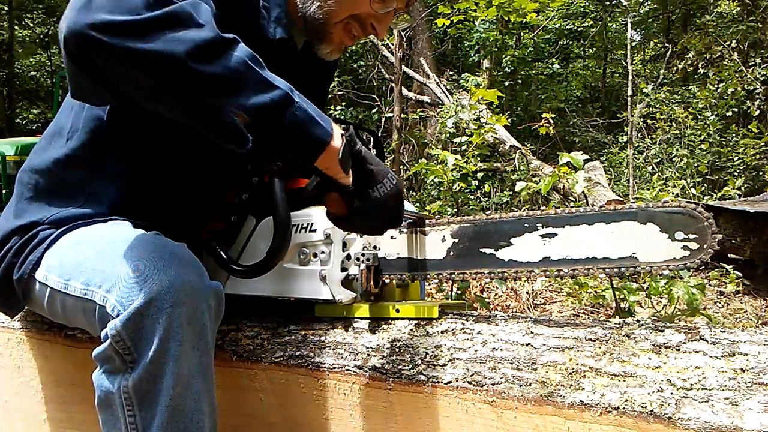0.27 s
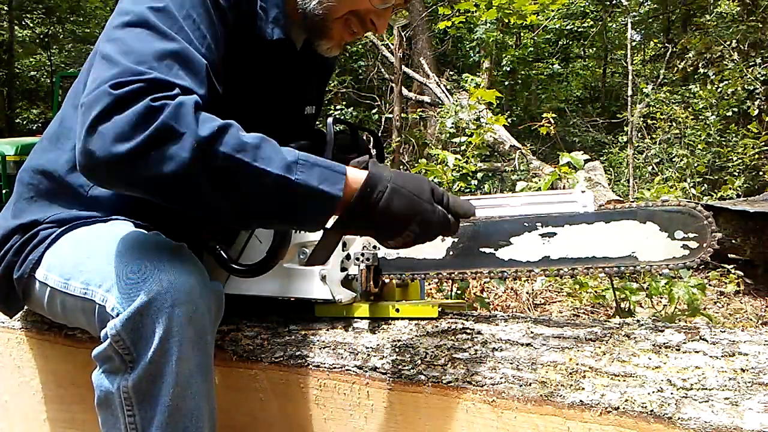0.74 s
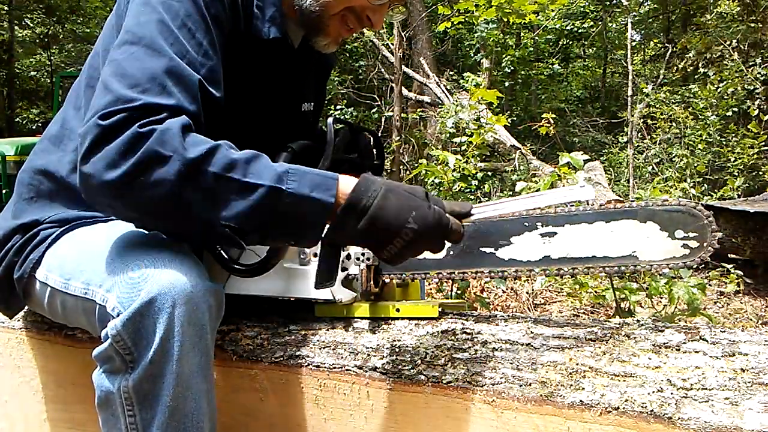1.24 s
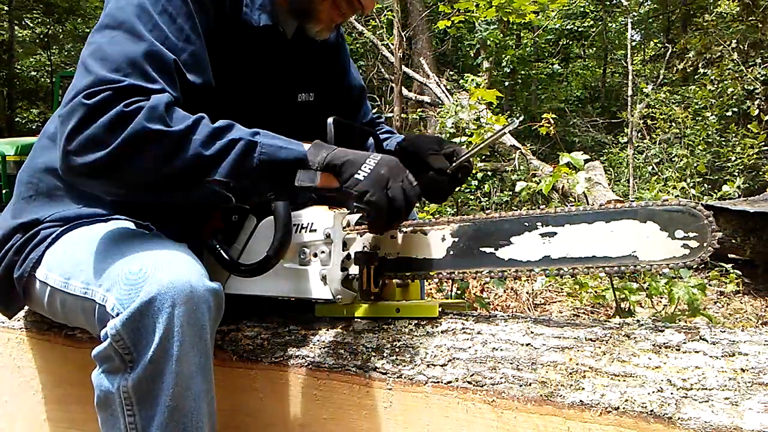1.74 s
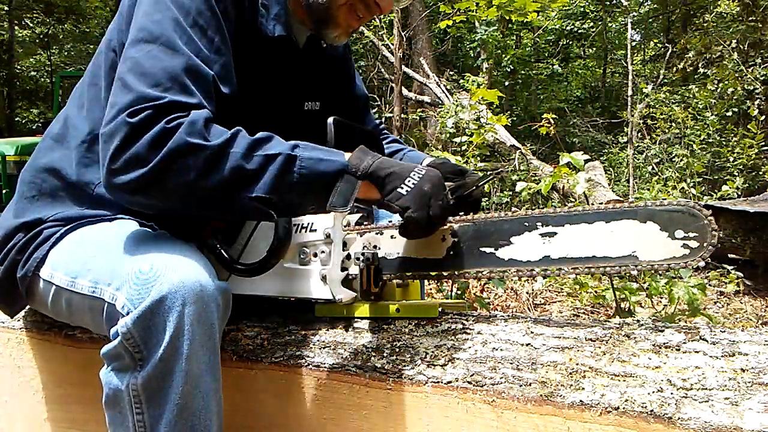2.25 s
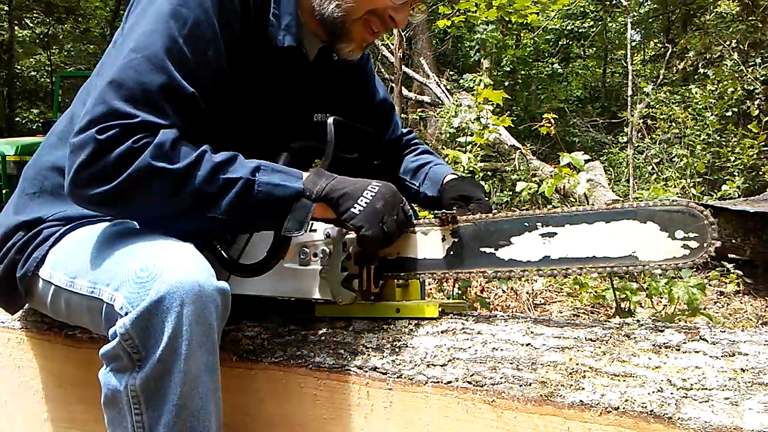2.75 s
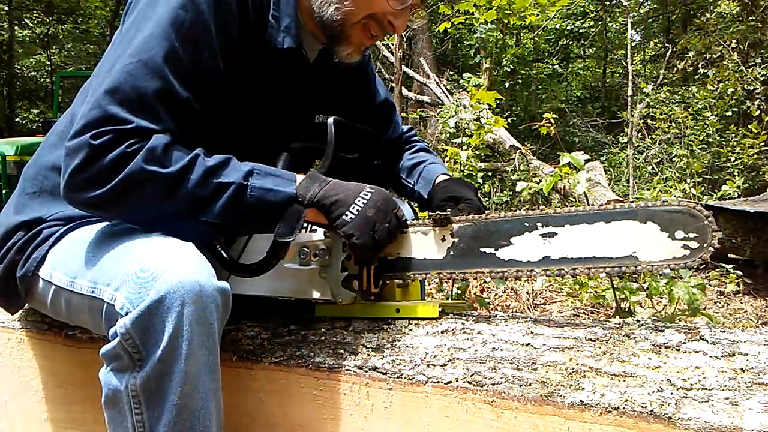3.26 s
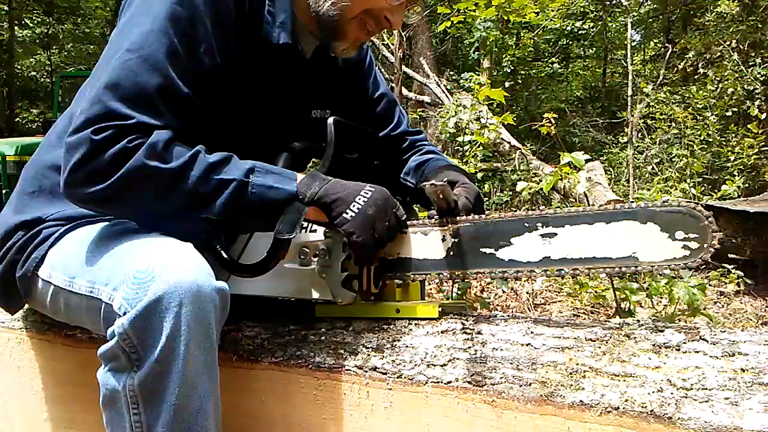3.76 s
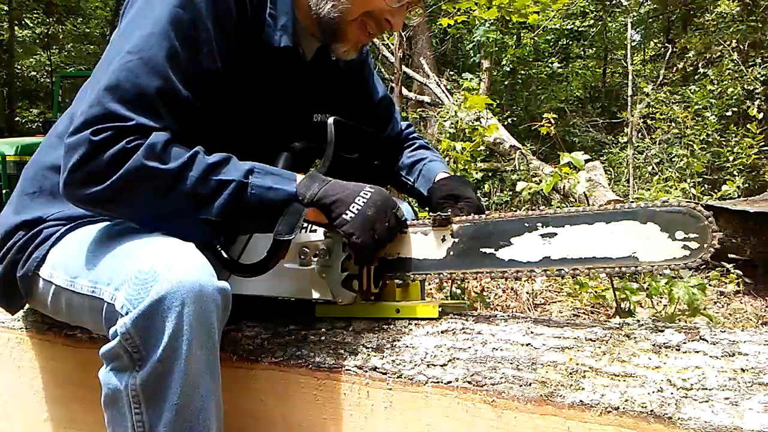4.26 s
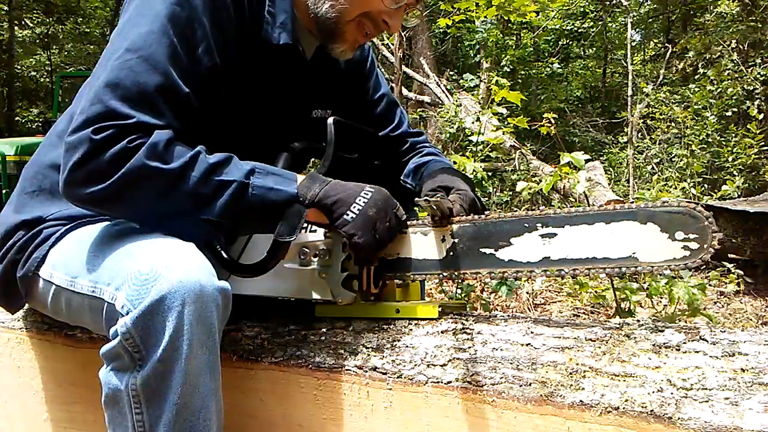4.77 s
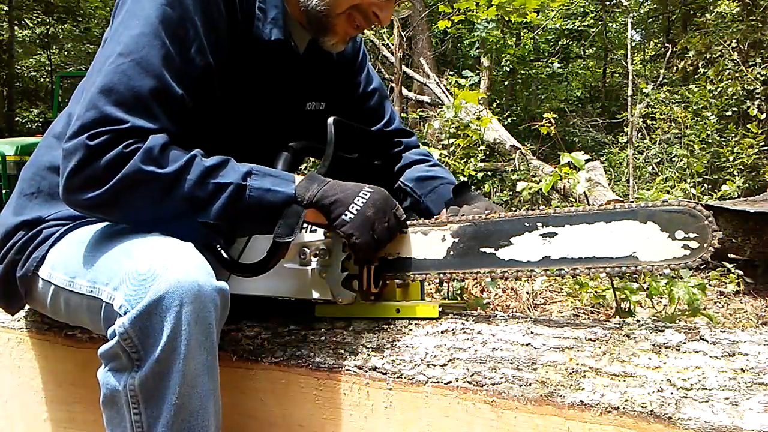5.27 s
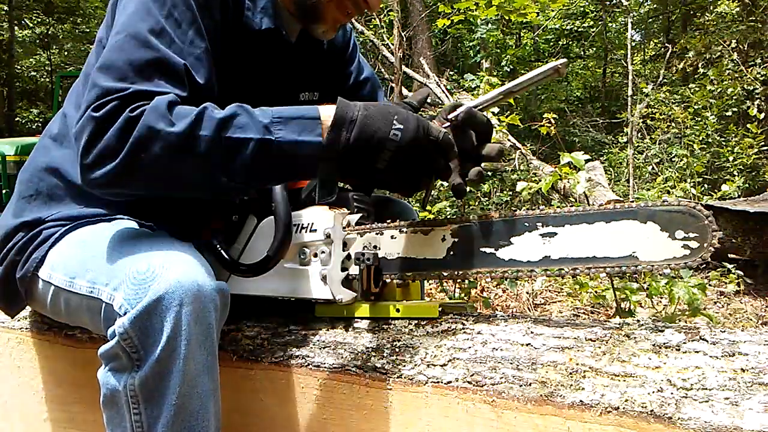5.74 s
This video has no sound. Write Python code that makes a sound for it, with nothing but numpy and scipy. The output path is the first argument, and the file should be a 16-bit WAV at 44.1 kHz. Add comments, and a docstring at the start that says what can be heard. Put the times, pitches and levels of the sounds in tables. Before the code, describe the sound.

Faint, softly crackling outdoor air lies underneath, with everything close and dry. Tiny clicks and a glove rub open, then from 0.2 to 0.6 seconds a file rasps over a saw tooth, grainy and hissy, swelling and fading. At 1.05 and 1.22 two very loud, sharp raps hit the steel bar, each chattering and rebounding within hundredths of a second, the second brighter, with a short lumpy echo from the trees. Around 2.0 to 2.25 a thin ping, a cluster of small clicks, a dull housing hum, glove rustle and a light scratchy slide. Sparse clicks and rubs continue from 2.65 to 3.1. A second stroke, more resonant, runs 3.3 to 3.85; clicks and cloth at 4.2 to 4.35; a third stroke 4.45 to 4.95. Two last hard raps ring at 5.32 and 5.51, then a faint rub at 5.84 and quiet.

```python
"""Outdoors at the edge of a wood, a saw chain is sharpened with a round file; the direct sound stands far above the trees.
First a few clicks and one long rasping stroke: grains of noise, paced by the file's teeth, through the saw's resonances.
Then two raps on the steel bar, noise cracks with dying sines, which the trees return as a lumpy noise tail.
Gloves rustle, file and links click, a cutter pings and the file slides lightly; two more strokes follow, with
clicks between them, then two last raps. Faint air lies under it all; the microphone chain gates, overloads and filters."""
import sys
import numpy as np
from scipy import signal
from scipy.fft import rfft, irfft, next_fast_len
from scipy.io import wavfile
from scipy.ndimage import uniform_filter1d

SR = 44100
rng = np.random.default_rng(int(sys.argv[2]) if len(sys.argv) > 2 else 0)


def to_wav(sig):
    """Store sig (one row per channel, or 1-D mono) as 16-bit WAV at the path in sys.argv[1].

    Samples outside -1..1 are clipped; the rate is SR.
    """
    pcm = np.clip(np.atleast_2d(sig), -1, 1) * 32767
    pcm = np.round(pcm).astype(np.int16)
    wavfile.write(sys.argv[1], SR, pcm.T)  # frames by channels


N = 265041
TIME = np.arange(N) / SR
PADDED = next_fast_len(N, True)
HZ = np.fft.rfftfreq(PADDED, 1 / SR)

# Spectrum of the quiet outdoor air: (frequency [Hz], level [dB])
AIR_SPECTRUM = [(20, 17.5), (60, 10), (130, -2), (300, 6), (600, 3), (1500, -2.5), (3600, -1.5), (3980, 8),
                (4400, -13.5), (5200, -14), (6000, -7), (7800, -2), (11000, -7), (16000, -14)]
# Spectrum of the crackle over the air: (frequency [Hz], level [dB])
CRACKLE_SPECTRUM = [(100, -13.5), (350, 1.5), (4100, 2.5), (5000, -9), (6500, -9.5), (9000, -24.5)]

# Gloves and sleeves rub on the saw: (start [s], length [s], level [dB])
GLOVE_RUBS = [(-.01, 0.059, -51.5), (0.145, 0.025, -56), (0.64, .02, -57), (1.407, 0.08, -60),
              (2.065, 0.174, -50.5), (2.25, 0.056, -61.5), (2.657, 0.048, -57.5), (2.77, 0.035, -54),
              (2.806, 0.066, -53.5), (2.98, .022, -58.5), (3.042, 0.036, -54.5), (3.093, 0.219, -58.5),
              (4.196, 0.026, -53.5), (4.252, 0.068, -55), (5.84, 0.049, -62)]
# Spectrum of the cloth: (frequency [Hz], level [dB])
CLOTH_SPECTRUM = [(100, -27), (250, -1), (440, 5.5), (620, 3), (950, 5), (1600, -1), (2800, -4.5),
                  (4100, -1.5), (4600, -57), (8000, -18), (16000, -46)]
# Every light rub starts quickly, presses harder by this much in all, then lets go
RUB_ATTACK_S, RUB_RELEASE_S, RUB_PRESS_DB = 0.0076, 0.012, 2

# Small clicks of file and links: (time [s], level before a common trim [dB], centre of colour [Hz],
# treble before fixed offsets [dB])
LINK_CLICKS = [(0.029, -49, 970, 14), (0.07, -42, 1330, -7), (0.14, -50, 1500, -10), (.214, -34, 1300, -21),
               (2.055, -41.5, 1209, -9.5), (2.075, -41, 696, -8), (2.108, -34, 1300, -8),
               (2.114, -36, 1200, -18), (2.1394, -33.5, 910, -14), (2.1648, -30.5, 1250, -8),
               (2.201, -34, 910, -10.5), (2.66, -30, 1600, 0), (2.736, -48, 2000, -13.5),
               (2.815, -43.5, 630, -16), (2.908, -44, 880, -19), (3.048, -42.5, 1106, -16),
               (4.199, -30, 1690, -9), (4.293, -29, 1820, -20), (4.329, -35, 1710, 3.5)]
# Ring of a click centred on 1 kHz; higher ones die sooner by this power
CLICK_T60_S, CLICK_DAMPING = 0.036, 0.34
# The saw's housing resounds as the file settles: (time [s], level [dB])
HOUSING_HUMS = [(2.141, -39.5), (2.201, -38.5)]
HOUSING_HZ, HOUSING_T60_S = 450, 0.095
# A cutter pings as the file is set on it: (frequency [Hz], level [dB], t60 [s])
CUTTER_PING = [(3720, -44, .065), (7880, -55, .09), (10330, -54, .07)]
PING_S = 2.023

# The file slides lightly into the gullet of a cutter
SLIDE_S, SLIDE_LENGTH_S, SLIDE_DB = 2.085, 0.073, -50.5
# Spectrum of that thin scratch: (frequency [Hz], level [dB])
SLIDE_SPECTRUM = [(4500, -47), (6200, -8.0), (7700, 9), (9500, -6), (11000, -12), (15000, -29)]

# Raps of the file on the bar: (time [s], level [dB], knock [dB], brightness [dB], fizz [dB],
# time to the rebound [s], rebound level against the rap [dB])
BAR_RAPS = [(1.0467, -7, -5, 1, -16, 0.01598, -10), (1.2166, -7, -6, 11.5, 5, .0128, -7),
            (5.3233, -4.5, -3, -4, -13.5, .0163, -5.5), (5.5080, -5, -4, 2.5, -8.5, .015, -12.5)]
# Modes of the bar before the chain damps them: (frequency [Hz], relative level [dB], t60 [s])
BAR_MODES = [(301, -14, 0.25), (804.6, -4, 0.095), (1186, -16, 0.058), (1520, -7, 0.051), (1748, -12, 0.11),
             (1770, -0.5, .06), (2540, -4.5, 0.089), (2834, -1.5, 0.06), (3261, -11, .06),
             (3517, -7.5, .05), (3999, -7.5, 0.11), (3870, -9.5, 0.21), (5104, -8, .04), (5380, -11, .05),
             (5740, -9.5, 0.062), (5660, -12, 0.024), (5810, -16, 0.027), (6990, -4.5, 0.059),
             (6390, -4.5, .06), (6700, -11, 0.036), (7170, -14, 0.078), (8500, -14, 0.03), (9400, -9, .05)]
# Spectrum of the dense crack of a contact: (frequency [Hz], level [dB])
CRACK_SPECTRUM = [(30, -31.5), (170, -35), (280, -8), (550, -9.5), (1300, -2), (1750, 2), (2150, -6),
                  (2750, 5), (3900, -6), (4350, -8.5), (5300, -0.5), (6500, -4.5), (10000, -7.5),
                  (12500, -15), (14000, -25.5), (16000, -36.5)]
# Spectrum of the ring as the trees return it: (frequency [Hz], level [dB])
TREE_SPECTRUM = [(100, -21.5), (250, -6), (900, -8.5), (1620, -11), (1780, -1), (2030, -12), (2500, -0.5),
                 (3200, -4), (3980, -2.5), (4450, -19), (5700, -8), (6650, -0.5), (7700, -2), (8500, -6.5),
                 (9700, -5), (11000, -14.5), (16000, -28.5)]
# Thin ring that lingers in the file, before a common lift: (frequency [Hz], level [dB])
FILE_MODES = [(1766, -59.5), (2530, -64), (2767, -60), (3268, -66), (3876, -67), (5582, -66.5), (6627, -61),
              (7617, -67), (7957, -70)]
FILE_RING_DB, FILE_T60_S, FILE_BLUR_HZ = 19.5, 0.5, 70
# The file's far end lands just after its tip
CHATTER_S, CHATTER_DB, CHATTER_BRIGHT_DB = .0026, -1, 1
# A lighter touch on the way to the rebound: share of the rebound time, level against the rebound
RATTLE_SHARE, RATTLE_DB = .65, -5.5

# Strokes of the file: (start [s], length [s], share of the length where it pushes hardest,
# level before the layer gain [dB], taper of the ends [power], hiss against body before the layer gains [dB])
FILE_STROKES = [(.185, 0.44, .44, -31.5, 1.035, -1), (3.3, 0.54, 0.66, -30, 2.64, -7.5),
                (4.46, 0.49, 0.7, -31, 2.185, -6)]
# Colour of the rasp below the microphone's dip: (frequency [Hz], level [dB])
RASP_SPECTRUM = [(90, -60), (200, -20), (310, -20), (430, -7.5), (570, -8), (690, -2), (800, -2),
                 (1700, -1.5), (2260, 2), (3300, -2.5), (4000, -1.5), (4300, -17)]
# Colour of the hiss above the dip: (frequency [Hz], level [dB])
HISS_SPECTRUM = [(4800, -42), (5300, -14.5), (5800, -3), (6700, -1), (7500, 0), (8700, -2.5), (10000, -3),
                 (11200, -13), (13000, -14.5), (14500, -27), (16000, -30)]
# Resonances and dips of the saw at the first cutter: (frequency [Hz], width [Hz], lift [dB])
FIRST_CUTTER_RESONANCES = [(354.5, 88, -6), (507, 140, 12.5), (916, 51, 9), (1077, 37, 12),
                           (1560, 110, 5.5), (1905, 72, 13.5), (2930, 180, -10), (2740, 340, 6),
                           (3890, 110, 2), (7800, 256, 9), (12600, 2900, 5)]
# The same at the next cutter: (frequency [Hz], width [Hz], lift [dB])
NEXT_CUTTER_RESONANCES = [(334, 20, 26.5), (568, 33, 15.5), (800, 71, 10.5), (884, 52, 7), (1142, 65, 13.5),
                          (1720, 66, -8.5), (1460, 180, 7.5), (1872, 150, 8.5), (2215, 144, 9.5),
                          (2660, 21, 5), (2970, 78, 5.5), (7450, 180, 8)]
# The bar's lowest resonance: (frequency [Hz], level [dB])
DRONE_SPECTRUM = [(150, -45), (250, -28), (335, -8), (370, -7.5), (450, -33), (800, -63)]
# Above this stroke level the teeth cut and hiss; below it they only rub
BITE_DB, BITE_SOFT_DB = -48, 1.5
BRIGHTEN_DB = 8.5  # the hiss gains this much against the rasp from the start of a stroke to its end
EDGE_HZ = 15950  # upper band limit


def gain_of(db):
    """Decibels to gain."""
    return 10 ** (np.asarray(db) / 20)


def evened(x):
    """Scales to rms 1."""
    return x / np.sqrt(np.mean(x ** 2) + 1e-20)


def read(points, hz):
    """Reads a spectrum along a log-frequency axis."""
    f, value = np.transpose(points)
    return np.interp(np.log(hz + 1), np.log(f + 1), value)


def add(mix, s, sound):
    """Lays a sound into the mix at time s."""
    part = mix[max(round(s * SR), 0):][:len(sound)]
    part += sound[:len(part)]


def colour(x, points, size=4096):
    """Causal filter with the given spectrum: nothing sounds before its cause."""
    hz = abs(np.fft.fftfreq(size, 1 / SR))
    log_gain = np.log(gain_of(read(points, hz)))
    minimum_phase = np.exp(signal.hilbert(log_gain).conj())
    taps = np.fft.ifft(minimum_phase).real[:size // 2]
    return signal.oaconvolve(x, taps)[:len(x)]


def shaped(x, db):
    """Gives a whole-length sound the spectrum db, at rms 1."""
    return evened(irfft(rfft(x, PADDED) * gain_of(db), PADDED)[:N])


def wander(rate_hz, size=N):
    """Random knots joined by straight lines, with rms about 1."""
    knots = rng.standard_normal(size // 100)
    return np.interp(TIME[:size] * rate_hz, np.arange(len(knots)), knots) * np.sqrt(3 / 2)


def patchy(x, depth_db, size=256, count=5, order=4):
    """Lifts and lowers short patches of time and frequency."""
    z = signal.stft(x, nperseg=size)[2]
    along_time = uniform_filter1d(rng.standard_normal(z.shape), count, 1)
    field = evened(uniform_filter1d(along_time, order, 0))
    return signal.istft(z * gain_of(depth_db * field), nperseg=size)[1][:len(x)]


def grains(per_s, spread_db):
    """Random tiny impulses, a few much larger than the rest."""
    size = gain_of(spread_db * np.minimum(rng.exponential(1, N), 4))
    sign = rng.choice([-1, 1], N)
    return evened(size * sign * (rng.random(N) < per_s / SR))


def ring(modes, t):
    """Dying sines of a struck piece of steel, each from a random phase."""
    return sum(gain_of(db - 60 * t / t60) * np.sin(2 * np.pi * (hz * t + rng.random()))
               for hz, db, t60 in modes)


def air(air_db=-64.0, crackle_db=-68, flicker_db=3.5, clump_db=4.5):
    """A faint steady wash of noise, with a soft flickering crackle of grains over it."""
    wash = shaped(patchy(rng.standard_normal(N), 1.4), read(AIR_SPECTRUM, HZ))
    ticks = grains(900, 2.6) * gain_of(clump_db * wander(65) + flicker_db * wander(21))
    crackle = shaped(ticks, read(CRACKLE_SPECTRUM, HZ))
    return gain_of(air_db) * wash + gain_of(crackle_db) * crackle


def rub(start, length):
    """Envelope of a light rub: attack, a hold that presses harder, release."""
    t = TIME - start
    gate = np.clip(t / RUB_ATTACK_S, 0, 1) * np.clip((length - t) / RUB_RELEASE_S, 0, 1)
    return gate * gain_of(RUB_PRESS_DB * (np.clip(t / length, 0, 1) - .5))


def gloves(uneven_db=2.5):
    """Cloth rubs over the saw in uneven little slips."""
    slips = shaped(grains(4000, 3.2), read(CLOTH_SPECTRUM, HZ)) * gain_of(uneven_db * wander(110))
    return slips * sum(gain_of(db) * rub(start, length) for start, length, db in GLOVE_RUBS)


def clicks(trim_db=-3.5, after_db=-16, after_t60=0.062, rise_s=0.00087):
    """Light, damped contacts: a short snap and a faint rattle after it; a cutter pings and the housing hums."""
    out, t = np.zeros(N), np.arange(SR // 6) / SR
    rise = 1 - np.exp(-t / rise_s)
    for s, db, hz, treble_db in LINK_CLICKS:
        spectrum = [(hz / 8, -26), (hz / 2, -4), (hz, 0), (3900, -7), (4700, treble_db - 40),
                    (5500, treble_db - 14.5), (7700, treble_db - 16.5), (15000, treble_db - 31)]
        t60 = CLICK_T60_S * (1000 / hz) ** CLICK_DAMPING
        snap = gain_of(-60 * t / t60)
        rattle = gain_of(after_db - 60 * t / after_t60)
        noise = evened(colour(rng.standard_normal(len(t)), spectrum))
        add(out, s, gain_of(db + trim_db) * (snap + rattle) * rise * noise)
    for s, db in HOUSING_HUMS:
        add(out, s, ring([(HOUSING_HZ, db, HOUSING_T60_S)], t) * rise)
    add(out, PING_S, ring(CUTTER_PING, t) * rise)
    return out


def slide(uneven_db=1.5):
    """A few teeth scratch without cutting: only a thin hiss."""
    thin = shaped(grains(3180, 7.6), read(SLIDE_SPECTRUM, HZ))
    return gain_of(SLIDE_DB + uneven_db * wander(200)) * thin * rub(SLIDE_S, SLIDE_LENGTH_S)


def trees(t60=0.56, lumpy_db=2, near_s=.19, far_db_per_s=90, size=SR // 2):
    """Trunks and leaves scatter one blow back: a dense, lumpy tail that thins beyond the nearest trees."""
    t = TIME[:size]
    tail = evened(colour(rng.standard_normal(size), TREE_SPECTRUM))
    fade_db = 60 * t / t60 + far_db_per_s * np.maximum(t - near_s, 0)
    build_up = 1 - np.exp(-t / 0.0087)
    return tail * gain_of(lumpy_db * wander(72, size=size) - fade_db) * build_up


def file_ring(size=SR // 2):
    """The file rings on in the moving hand, so each of its modes wavers and blurs."""
    t, modes = TIME[:size], 0
    for hz, db in FILE_MODES:
        waver = wander(FILE_BLUR_HZ, size=size) + 1j * wander(FILE_BLUR_HZ, size=size)
        modes = modes + gain_of(db) * waver * np.exp(2j * np.pi * hz * t)
    return modes.real / np.sqrt(2) * gain_of(FILE_RING_DB - 60 * t / FILE_T60_S)


def contacts(rebound_s, rebound_db):
    """The touches of one rap: (delay [s], level [dB], added brightness [dB])."""
    return [(0, 0, 0), (CHATTER_S, CHATTER_DB, CHATTER_BRIGHT_DB),
            (RATTLE_SHARE * rebound_s, rebound_db + RATTLE_DB, 0), (rebound_s, rebound_db, 0)]


def raps(crack_t60=0.023, crack_db=0.0, ring_db=-13.0, trees_db=-32, echo_colour=0.44, damping_db_per_s=220):
    """The file strikes the bar, chatters and rebounds; each touch cracks and rings the steel."""
    out, t = np.zeros(N), TIME[:SR // 4]
    for s, db, knock_db, bright_db, fizz_db, rebound_s, rebound_db in BAR_RAPS:
        add(out, s, gain_of(db) * file_ring())
        for delay, touch_db, sharper_db in contacts(rebound_s, rebound_db):
            contact = [(700, knock_db), (2000, 0), (3800, 0),
                       (6300, bright_db + sharper_db), (8500, fizz_db + sharper_db)]
            crack = colour(rng.standard_normal(len(t)) * gain_of(-60 * t / crack_t60), CRACK_SPECTRUM)
            # the chain damps the bar
            steel = gain_of(ring_db - damping_db_per_s * t) * ring(BAR_MODES, t)
            blow = 2 * gain_of(crack_db) * crack + steel
            add(out, s + delay, gain_of(db + touch_db) * colour(blow, contact))
            # the trees gather sound sent in all directions, so their echo varies less from blow to blow
            gathered = [(hz, echo_colour * lift_db) for hz, lift_db in contact]
            add(out, s + delay, gain_of(db + touch_db + trees_db) * colour(trees(), gathered))
    return out


def push(start, length, crest, db, taper, hiss_db):
    """One stroke as an arch of effort: gives the gain of the rasp, the gain of the hiss and the file's speed."""
    along = np.clip((TIME - start) / length, 0, 1)
    arch = np.sin(np.pi * np.interp(along, [0, np.clip(crest, .1, .9), 1], [0, .5, 1]))
    body = gain_of(db) * arch ** taper
    body_level_db = 20 * np.log10(body + 1e-12)
    cutting = .5 + .5 * np.tanh((body_level_db - BITE_DB) / (2 * BITE_SOFT_DB))
    hiss = body * cutting * gain_of(hiss_db + BRIGHTEN_DB * (along - crest))
    return body, hiss, np.sqrt(arch)


def catching(x, resonances, effort, flare_db=2.04, sing_db=5, per_s=25, size=1024):
    """Harder pushes make strong resonances sing; as the file catches, each swells and sinks on its own."""
    hz, t, z = signal.stft(x, SR, nperseg=size)
    field_db = np.zeros(z.shape)
    for centre, width, lift_db in resonances:
        swell_db = flare_db * wander(per_s) + sing_db * (lift_db / 10) * (effort ** 2 - .5)
        half_width = max(width / 2, SR / size)
        peak = 1 / (1 + ((hz - centre) / half_width) ** 2)
        field_db += np.outer(peak, np.interp(t, TIME, swell_db))
    return signal.istft(z * gain_of(field_db), nperseg=size)[1][:len(x)]


def filing(strokes, resonances, body_db, hiss_db, drone_db, teeth_hz=520, bite=0.36, chatter_db=1.15,
           comb_hz=712, reflection_db=4.0, unsteady_db=0.3):
    """File teeth tear off chips, faster in mid-stroke; the chips' impulses excite cutter and saw."""
    body, hiss, speed = np.sum([push(*row) for row in strokes], axis=0)
    teeth_rate_hz = teeth_hz * speed * (1 + 0.1 * wander(60))
    teeth = 1 + bite * np.cos(2 * np.pi * np.cumsum(teeth_rate_hz) / SR)
    # the file grabs and slips
    grip = gain_of(chatter_db * wander(130) + unsteady_db * wander(30))
    chips = grains(12000, 1.47) * teeth * grip
    lift_db = sum(db / (1 + (2 * (HZ - hz) / width) ** 2) for hz, width, db in resonances)
    below_dip_db = -10 * np.log10(1 + (HZ / 4200) ** 70)
    caught = catching(patchy(chips, 2.07, size=512, count=4, order=3), resonances, body / body.max())
    rasp = shaped(caught, read(RASP_SPECTRUM, HZ) + lift_db + below_dip_db)
    # a reflection off the saw ripples the hiss
    comb_db = reflection_db * np.cos(2 * np.pi * HZ / comb_hz)
    fizz = shaped(patchy(chips, 0.7, size=512), read(HISS_SPECTRUM, HZ) + lift_db + comb_db)
    # the bar drones at its lowest resonance as soon as the file moves, however lightly it cuts
    drone = shaped(chips, read(DRONE_SPECTRUM, HZ)) * np.sqrt(body)
    return gain_of(body_db) * body * rasp + gain_of(hiss_db) * hiss * fizz + gain_of(drone_db) * drone


def scene():
    """Air, handling, raps and strokes, from the background to the file."""
    background = air() + gloves() + clicks() + slide()
    first = filing(FILE_STROKES[:1], FIRST_CUTTER_RESONANCES, body_db=-2.5, hiss_db=-4, drone_db=-33)
    later = filing(FILE_STROKES[1:], NEXT_CUTTER_RESONANCES, body_db=-2.0, hiss_db=2, drone_db=-32)
    return (background + raps() + first + later)[None]


def record(dry, open_db=-55, shut_db=-10):
    """A gate lowers faint treble; the loudest raps overload; then a wind filter and the band limit."""
    treble = signal.oaconvolve(dry, signal.firwin(63, 5600, pass_zero=False, fs=SR)[None], "same")
    treble_db = 10 * np.log10(abs(uniform_filter1d(treble ** 2, size=1000)) + 1e-14)
    opened = np.clip((treble_db - open_db) / 2 + .5, 0, 1)
    gated = dry + treble * (gain_of(shut_db * (1 - opened)) - 1)
    # peaks bend smoothly towards a ceiling of 0.83
    clipped = gated / (1 + (gated / .83) ** 6) ** (1 / 6)
    thinned = signal.lfilter(*signal.butter(1, 140, "high", fs=SR), clipped)
    band_limit = signal.firwin(511, EDGE_HZ, window=("kaiser", 9), fs=SR)
    return signal.oaconvolve(thinned, band_limit[None], "same")


dry = scene()
out = record(dry)
to_wav(out)
```